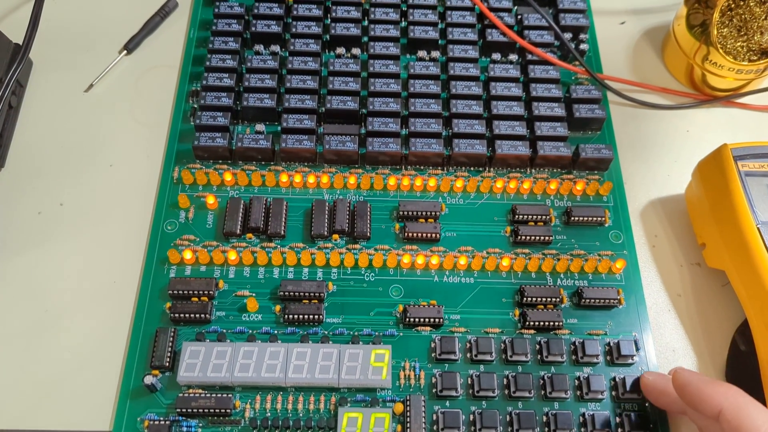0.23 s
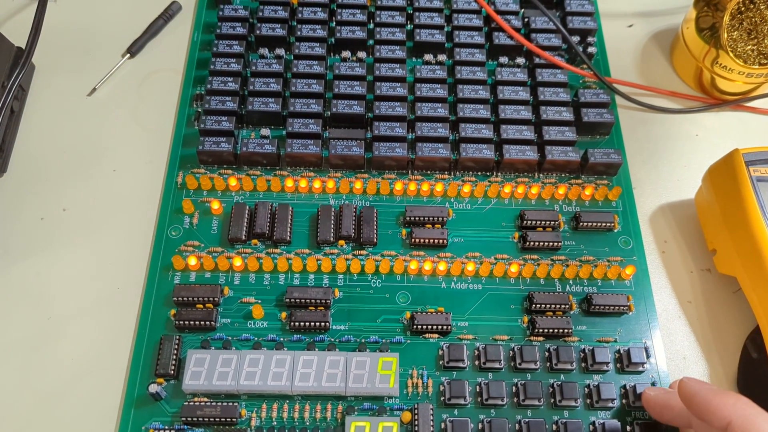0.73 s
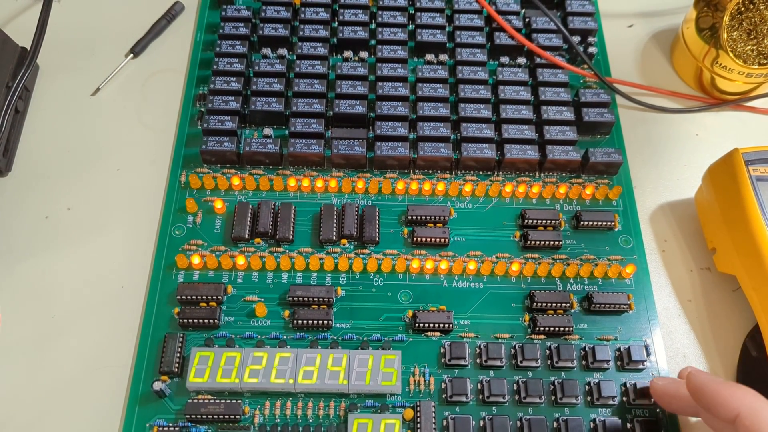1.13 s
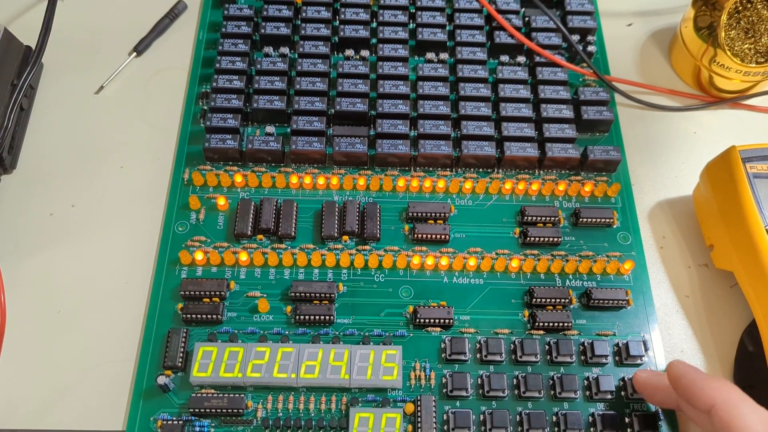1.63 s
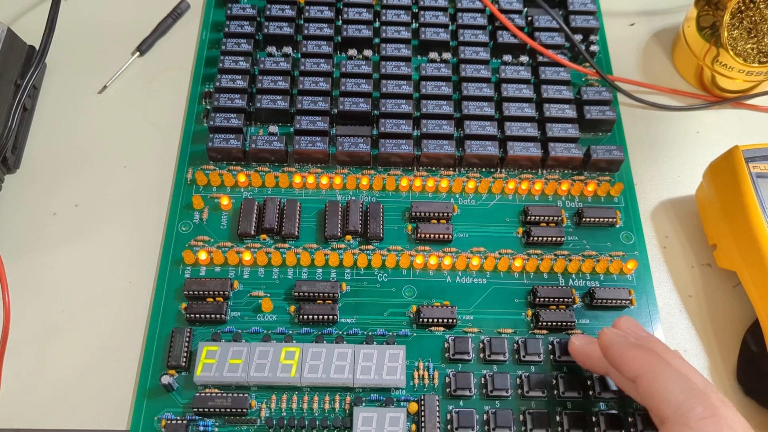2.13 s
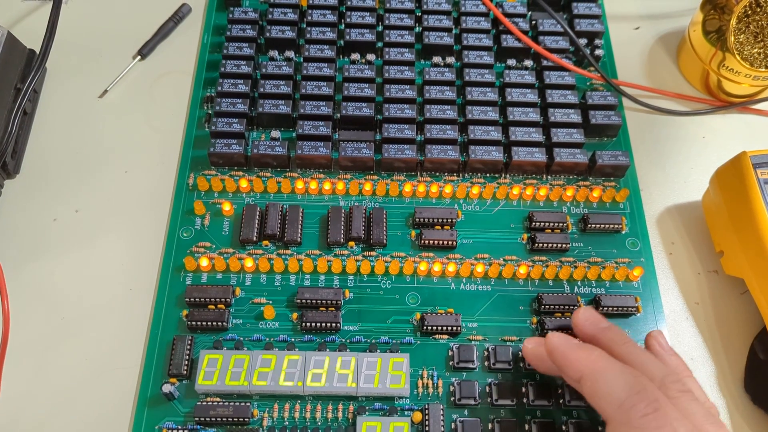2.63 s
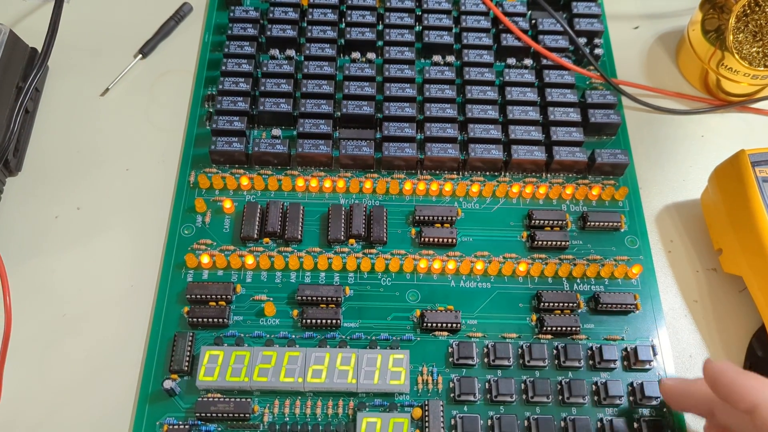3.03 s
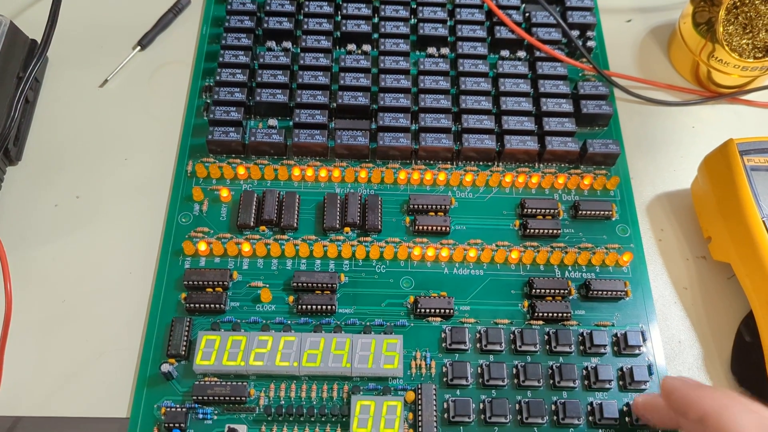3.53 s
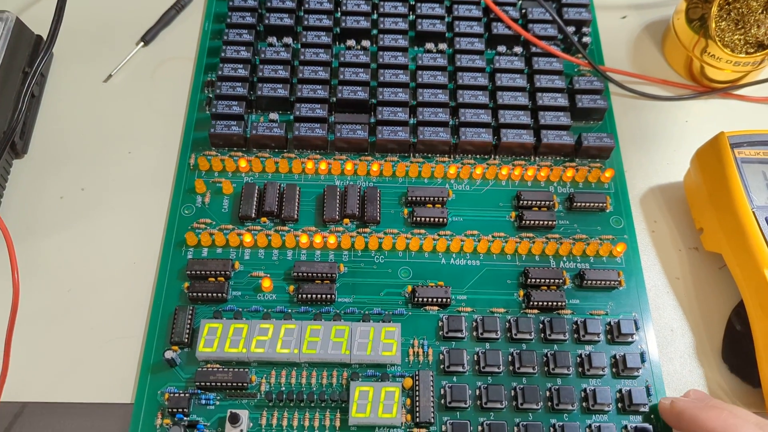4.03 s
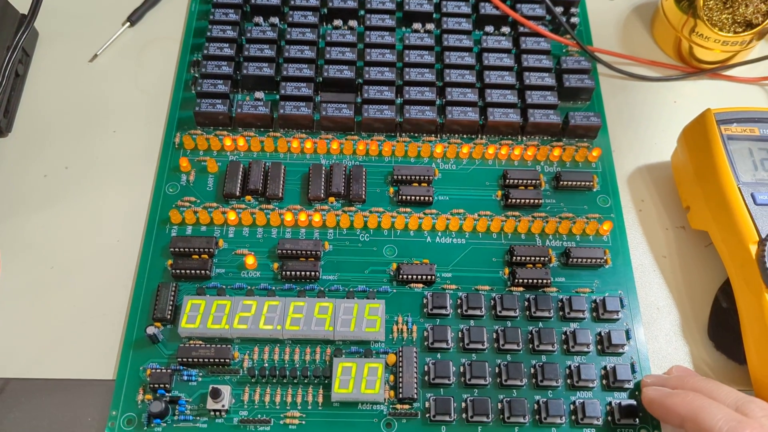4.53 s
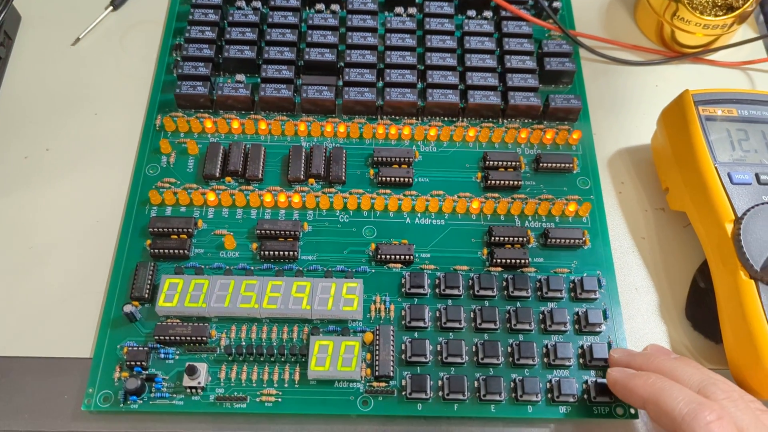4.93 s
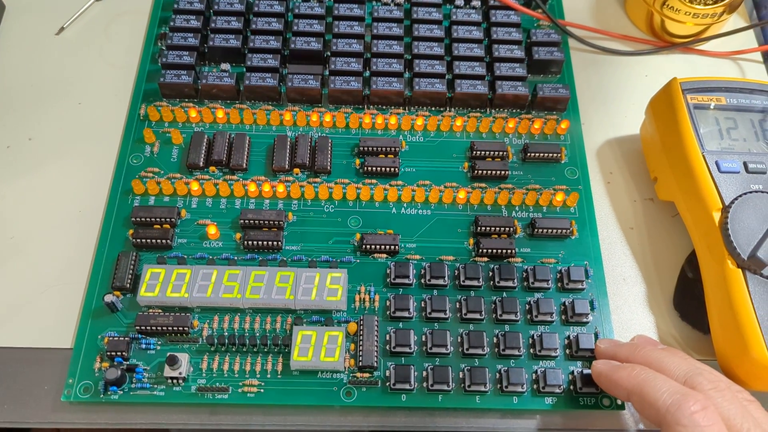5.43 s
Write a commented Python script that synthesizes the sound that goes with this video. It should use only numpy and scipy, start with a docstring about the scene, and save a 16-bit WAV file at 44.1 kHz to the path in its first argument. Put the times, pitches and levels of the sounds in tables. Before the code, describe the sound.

A few lone relay clicks and button presses over faint room hiss and hum, then a fast, steady mechanical relay chatter runs to the end.

```python
"""A relay computer on a desk, heard from close above in a small room.
A steady rush and low hums come first: noise shaped in two bands, and wavering sine lines.
Single relays, built from noise bursts and case modes, then click as keys thump and tick in struck modes.
From about 3.6 s a clock runs at some eleven cycles a second: in a loop of six steps, volleys of relays
pull in and drop out, the circuit board drums along in its own modes, and the small room answers."""
import sys
import numpy as np
from scipy import signal
from scipy.fft import rfft, irfft
from scipy.io import wavfile
from scipy.ndimage import uniform_filter1d

SR = 44100
rng = np.random.default_rng(int(sys.argv[2]) if len(sys.argv) > 2 else 0)


def int16_out(signal):
    """Quantize to a 16-bit WAV file."""
    q = np.round(np.clip(np.atleast_2d(signal).T, -1, 1) * 32767)
    wavfile.write(sys.argv[1], SR, q.astype(np.int16))


N = 251370

# Lone relay clicks: (time [s], relative level [dB], case ring boost [dB], case ring centre [Hz],
# sparkle [dB], left over right [dB])
SINGLE_CLICKS = [(1.019, -38, 5, 6900, -2, 1.5), (1.6932, -35.5, 7, 6900, 2, -2.5),
                 (2.6597, -26.5, 6, 1860, 0.5, 0.5), (3.602, -29, -2.5, 2000, 7, -4.5),
                 (3.6373, -35, 1, 2980, 1, 3)]
# Six program steps, each with its own timing, level and colour for a volley pulling in and one
# dropping out, before scatter and drift: (time after the tick [s], relative level [dB],
# case ring boost [dB], case ring centre [Hz], sparkle [dB], left over right [dB])
PULL_IN_STEPS = [(.0044, -28, -3, 2190, -2, -5), (.0058, -28, -2.5, 2280, -3, -2.5),
                 (.0045, -27.5, 0.5, 2720, -3, -1), (.0047, -27, -2, 2290, -2.5, -3.5),
                 (.0048, -27.5, -1, 2350, -1, -8), (.0051, -25, -1.5, 2400, -1.5, -3)]
DROP_OUT_STEPS = [(.0442, -28.5, 4.5, 2450, -2, -4.5), (.0445, -27, -3.5, 3300, -3, -4.5),
                  (.0443, -29, -0.5, 1800, -2.5, -6), (.0438, -30.5, 4.5, 1760, -4, -13.5),
                  (.0442, -26.5, 3, 2200, -3, -5), (.0447, -26, 1.5, 2300, -2, -6)]
CLOCK_START_S, CLOCK_PERIOD_S = 3.632, .08795  # first tick, and time from tick to tick


def gain_of(db):
    """Decibels to amplitude."""
    return 10 ** (np.asarray(db) / 20)


def evened(x):
    """Scales to rms 1."""
    return x / np.sqrt(np.mean(x ** 2) + 1e-20)


def read(points, hz):
    """Joins (frequency [Hz], value) points by straight lines on a log frequency axis."""
    f, value = np.transpose(points)
    return np.interp(np.log(hz + 1), np.log(f + 1), value)


def add(mix, s, sound):
    """Mixes a sound in at time s, cutting whatever runs past the end."""
    part = mix[:, max(round(s * SR), 0):][:, :sound.shape[-1]]
    part += sound[..., :part.shape[1]]


def colour(x, curve_db, size=2048):
    """Causal minimum-phase filter with the gain curve_db(Hz), one row for each ear."""
    log_gain = np.log(gain_of(curve_db(abs(np.fft.fftfreq(size, 1 / SR)))))
    taps = np.fft.ifft(np.exp(np.conj(signal.hilbert(log_gain)))).real
    return signal.fftconvolve(x, taps[:, :size // 2], axes=1)[:, :x.shape[1]]


def shaped(x, spectrum):
    """Gives each ear its own side of a (Hz, left dB, right dB) spectrum."""
    def curve_db(hz):
        points = np.array(spectrum)
        return np.array([read(points[:, [0, ear]], hz) for ear in (1, 2)])
    return colour(x, curve_db)


def ring(modes, scatter_db=0.):
    """Decaying sines of a struck body; where the blow lands changes how much each mode gets."""
    t = np.arange(SR // 4) / SR
    out = np.zeros(len(t))
    for hz, db, t60 in modes:
        decay = gain_of(db + scatter_db * rng.standard_normal() - 60 * t / t60)
        out += decay * np.sin(2 * np.pi * (hz * t + rng.random()))
    return out


def onset(rise_s):
    """Gain of a body that needs a moment to get moving."""
    t = np.arange(SR // 4) / SR
    return 1 - np.exp(-(t / rise_s) ** 2)


def air(low_db=-53.5, high_db=-65.5):
    """Steady rush of the room: shaped noise in a low and a high layer, alike in both ears in the bass."""
    # Spectra of the two layers: (frequency [Hz], relative density [dB per Hz])
    low_spectrum = [(20, -39), (32, -16.5), (45, -17.5), (65, -10), (90, -10), (135, -4), (270, -8.5),
                    (480, -8.5), (600, -9.5), (1400, -11), (2000, -10), (2800, -18.5), (3640, -52),
                    (6000, -100)]
    high_spectrum = [(1650, -59.5), (2800, 3), (3120, 4), (3860, -10), (4240, -8.5), (5560, -15.5),
                     (6020, -14), (9530, -32.5), (11700, -27.5), (13800, -29.5), (15100, -38), (16000, -32)]
    # Likeness of the ears: (frequency [Hz], shared part of the power [0-1])
    ear_likeness = [(60, .97), (130, .92), (290, .75), (640, .2), (1400, .03), (15000, .03)]
    hz = np.fft.rfftfreq(N, 1 / SR)
    left, other = rfft(rng.standard_normal((2, N)))
    same = np.sqrt(np.clip(read(ear_likeness, hz), 0, 1))
    right = same * left + np.sqrt(1 - same ** 2) * other
    noise = np.array([left, right])
    low = evened(irfft(noise * gain_of(read(low_spectrum, hz)), N))
    high = evened(irfft(noise * gain_of(read(high_spectrum, hz)), N))
    return gain_of(low_db) * low + gain_of(high_db) * high


def tone(hz, waver_hz):
    """A sine line of rms 1 whose pitch wavers by waver_hz (rms)."""
    drift = evened(uniform_filter1d(rng.standard_normal(N), SR // 8))
    return np.sqrt(2) * np.sin(2 * np.pi * np.cumsum(hz + waver_hz * drift) / SR)


def hum():
    """Mains hum, a drone that comes and goes early on, and a faint fan-like whine, all wavering sines."""
    # Loudness of the two hums in turn: (time [s], level [dB])
    mains_level = [(0, -76), (.9, -70), (1.6, -67.5), (2.2, -62), (3.6, -62.5), (4.2, -70), (5, -72),
                   (5.7, -62)]
    drone_level = [(0, -93), (.15, -61.5), (.35, -58), (.65, -62.5), (.85, -75), (1.25, -59), (1.6, -85.5),
                   (2, -64.5), (2.3, -84)]
    # Steady whine lines: (frequency [Hz], level [dB])
    whine_lines = [(1444, -68.5), (1575, -69.5)]
    t = np.arange(N) / SR
    mains = gain_of(np.interp(t, *np.transpose(mains_level))) * tone(59.3, waver_hz=0.39)
    drone = gain_of(np.interp(t, *np.transpose(drone_level))) * tone(143.5, waver_hz=2.68)
    whine = sum(gain_of(db) * tone(hz, waver_hz=3.49) for hz, db in whine_lines)
    return mains + drone + whine


def relay(crack_t60, ring_db, ring_t60, case_db, snap_db, snap_t60=0.0045, case_t60=0.036, count=4):
    """One relay: the armature's snap and crack, a dense ring of spring and neighbours, a few case modes."""
    t = np.arange(SR // 20) / SR
    crack, dense = rng.standard_normal((2, 2, len(t)))
    voice = crack * gain_of(-60 * t / crack_t60) + dense * gain_of(ring_db - 60 * t / ring_t60)
    case_decay = gain_of(case_db - 60 * t / case_t60)
    for hz in np.exp(rng.uniform(np.log(1800), np.log(8000), count)):
        voice += case_decay * np.sin(2 * np.pi * (hz * t + rng.random((2, 1))))
    # the direct snap is the same in both ears and reaches the right one two samples earlier
    snap = rng.choice([-1, 1], len(t)) * gain_of(snap_db - 60 * t / snap_t60)
    voice += np.array([np.roll(snap, 2), snap])
    return voice / np.linalg.norm(voice)


def voiced(sound, db, case_db, case_hz, sparkle_db, side_db, case_octaves=0.59):
    """Level (rms over 18 ms, before colouring) and colour, standing for a place on the board."""
    def curve_db(hz):
        case = case_db * np.exp(-(np.log2((hz + 1) / case_hz) / (case_octaves + 0.15)) ** 2)
        sparkle = sparkle_db * read([(8000, 0), (10000, 1)], hz)
        side = side_db * read([(2800, 0), (4200, 1), (7000, 1), (10000, 0)], hz)
        return case + sparkle + np.array([side, -side]) / 2
    levelled = sound / np.linalg.norm(sound) * np.sqrt(.018 * SR)
    return gain_of(db) * colour(levelled, curve_db)


def single_clicks(level_db=13.5, case_octaves=0.27):
    """Lone relays answer the keys, their case modes barely ringing; the last is the clock's first tick."""
    # Spectrum of a lone relay: (frequency [Hz], left [dB], right [dB])
    lone_spectrum = [(147.6, -33, -28), (440, -11.5, -7), (1000, -13, -48), (1730, -7.5, -3.5),
                     (2280, -1.5, -12.5), (3170, -7.5, -1), (5240, -2.5, 0.5), (5650, -24, -1.5),
                     (7120, -6, -3), (9040, -13.5, -12), (9700, -13.5, -24), (12300, -18.5, -14),
                     (13720, -21, -24), (15200, -28, -19.5)]
    out = np.zeros((2, N))
    for s, *voicing in SINGLE_CLICKS:
        voice = relay(crack_t60=0.011, ring_db=-12.5, ring_t60=0.066, case_db=-23, snap_db=1, snap_t60=0.0035)
        add(out, s, voiced(voice, *voicing, case_octaves=case_octaves))
    return gain_of(level_db) * shaped(out, lone_spectrum)


def board(single_db=-22, pull_db=-15.0, drop_db=-21, rise_s=0.0036):
    """Each click or volley also shakes the circuit board, each time with another mix of its modes."""
    # Circuit board modes: (frequency [Hz], relative level [dB], t60 [s])
    board_modes = [(231, -9, 0.12), (305.6, -4, 0.16), (331.2, -5.5, 0.2), (392.6, -5.5, 0.095),
                   (446.6, -1, 0.076), (702, -13, 0.13), (1138, 0.5, 0.044), (1247, -8, 0.079)]
    out = np.zeros((2, N))
    pulls = clocked(PULL_IN_STEPS, first_cycle=1)
    drops = clocked(DROP_OUT_STEPS)
    for blows, share_db in ((SINGLE_CLICKS, single_db), (pulls, pull_db), (drops, drop_db)):
        for s, db, *_ in blows:
            add(out, s, gain_of(db + share_db) * ring(board_modes, scatter_db=2.8) * onset(rise_s))
    return out


def keys(desk_rise_s=0.0081, tick_rise_s=.0004, clack_db=-4, clack_t60=0.039, clack_hz=2300):
    """A finger works a key: a plastic tick, a dull clack of the loose cap and a thump into the desk."""
    # Key strokes: (time [s], desk thump gain [dB], plastic tick gain [dB])
    strokes = [(1.021, -48, -56), (1.694, -48, -44), (1.813, -64, -45), (2.6598, -43.5, -35),
               (2.7507, -48, -35.5), (2.767, -60, -40), (3.606, -40.5, -37.5)]
    # Modes of key plastic and of desk: (frequency [Hz], relative level [dB], t60 [s])
    plastic_modes = [(389, -16.5, 0.13), (428, -34, 0.046), (974, -26, 0.024), (1386, -6.5, 0.04),
                     (1570, -6.5, 0.017), (1733, -5, 0.045)]
    desk_modes = [(84, 6.5, 0.058), (102, -8, 0.15), (120.2, -4.5, 0.15), (157, 2.5, 0.039)]
    out = np.zeros((2, N))
    t = np.arange(SR // 4) / SR
    dull = signal.butter(3, clack_hz, fs=SR, output="sos")
    for s, thump_db, tick_db in strokes:
        clack = evened(signal.sosfilt(dull, rng.standard_normal((2, len(t)))))
        clack *= gain_of(clack_db - 60 * t / clack_t60)
        tick = (ring(plastic_modes) + clack) * onset(tick_rise_s)
        thump = ring(desk_modes) * onset(desk_rise_s)
        add(out, s, gain_of(thump_db) * thump + gain_of(tick_db) * tick)
    return out


def room(x, first_s=0.013, swell_s=0.002):
    """Walls answer after a short gap with sparse random echoes; each band dies at its own speed."""
    # Decay of the room: (frequency [Hz], t60 [s])
    decay_times = [(200, 0.53), (2000, 0.17), (5000, 0.3), (9000, 0.22), (15000, 0.43)]
    # Tone of the room: (frequency [Hz], gain [dB])
    tail_spectrum = [(200, -9), (2000, -9.5), (5000, -11), (9000, -11.5), (15000, -19)]
    t = np.arange(SR // 2) / SR
    taps = rng.standard_normal((2, len(t))) * (rng.random((2, len(t))) < 5000 / SR)  # 5000 echoes a second
    taps *= 1 - np.exp(-np.maximum(t - first_s, 0) / swell_s)
    hz, when, bands = signal.stft(taps, SR, nperseg=256)
    bands *= gain_of(-60 * when / read(decay_times, hz)[:, None])
    tail = signal.istft(bands, SR, nperseg=256)[1]
    tail = colour(tail / np.linalg.norm(tail[0]), lambda f: read(tail_spectrum, f)[None])
    return signal.fftconvolve(x, tail, axes=1)[:, :N]


def clocked(loop, first_cycle=0):
    """Plays the loop's steps in turn, one per tick, with scatter: no two strikes are alike."""
    case_scatter_db, case_scatter_octaves = 1.2, .04
    # drift as the microphone moves over the board: louder, brighter and to the left [dB per s]
    swell, brighten, leftward = 0.1, 0.54, 1.15
    rows = []
    for cycle in range(first_cycle, int((N / SR - CLOCK_START_S) / CLOCK_PERIOD_S) + 1):
        delay, db, case_db, case_hz, sparkle_db, side_db = loop[cycle % len(loop)]
        case_db += case_scatter_db * rng.standard_normal()
        case_hz *= 2 ** (case_scatter_octaves * rng.standard_normal())
        run_s = cycle * CLOCK_PERIOD_S
        rows.append((CLOCK_START_S + run_s + delay, db + swell * run_s, case_db, case_hz,
                     sparkle_db + brighten * run_s, side_db + leftward * run_s))
    return rows


def volley(bank, delays, blows_db):
    """Several relays, drawn at random from the bank, strike, each after its own delay [s]."""
    out = np.zeros((2, SR // 12))
    for which, delay, db in zip(rng.permutation(len(bank)), delays, blows_db):
        add(out, delay, gain_of(db) * bank[which])
    return out


def drop_outs(bank, level_db=7.5, lead_s=.0055, spread_s=.013, others_db=-5, soft_db=6, count=8):
    """Contacts part softly, then springs throw the armatures on their stops, loosely in step."""
    out = np.zeros((2, N))
    for s, db, case_db, *voicing in clocked(DROP_OUT_STEPS):
        delays = spread_s * (np.arange(count) + rng.random(count)) / count
        softening_db = soft_db * np.maximum(1 - delays / lead_s, 0)
        blows_db = others_db + rng.normal(0, 2.0, count) - softening_db
        # a strong case ring means that one relay stands out of the volley
        sound = volley(bank, np.r_[lead_s, delays], np.r_[max(case_db, 0), blows_db])
        click = voiced(sound, db, case_db, *voicing, case_octaves=0.11)
        add(out, s - lead_s, gain_of(level_db) * click)
    # in some cycles one slow relay lets go late in its volley
    slow_cycles, slow_delay_s, slow_db = (1, 3, 9, 15, 17, 21), .0508, -27.5
    for cycle in slow_cycles:
        slow = np.sqrt(SR / 50) * bank[rng.integers(len(bank))]  # rms 1 over 20 ms
        add(out, CLOCK_START_S + cycle * CLOCK_PERIOD_S + slow_delay_s, gain_of(slow_db) * slow)
    return out


def pull_ins(bank, level_db=12.0, spread_s=.012, fade_db=9, lead_s=.0013, lead_db=-13, count=8):
    """Contacts touch lightly, then the armatures slam home one upon another, the late ones softer."""
    out = np.zeros((2, N))
    for s, *voicing in clocked(PULL_IN_STEPS, first_cycle=1):  # the very first tick is a single click
        lag = np.r_[0, ((np.arange(count) + rng.random(count)) / count) ** 1.6]
        blows_db = -fade_db * lag + np.r_[0, rng.normal(-2, 3, count)]
        sound = volley(bank, np.r_[0, lead_s + spread_s * lag], np.r_[lead_db, blows_db])
        add(out, s - lead_s, voiced(sound, *voicing))
    return gain_of(level_db) * out


def scene(count=40):
    """Room rush and hum, then lone relays, board and keys, then the clocked bank of relays."""
    # Spectrum of a volley: (frequency [Hz], left [dB], right [dB])
    volley_spectrum = [(150, -35.5, -35), (540, -21, -24), (1050, -17, -30), (1270, -11, -23.5),
                       (1725, -8, -11.5), (2220, -1, -5.5), (2970, -4.5, -15), (3110, -10, -8),
                       (3820, -14, -9.5), (4730, -9.5, -0.5), (5950, -15, -10), (7350, -7.5, -10.5),
                       (7380, -14.5, -11), (9660, -18.5, -17), (11700, -14, -17.5), (14200, -21, -18),
                       (14800, -18.5, -43)]
    bank = [relay(crack_t60=0.012, ring_db=-5.5, ring_t60=0.063, case_db=-13.0, snap_db=-5.5)
            for _ in range(count)]
    chatter = gain_of(4.5) * shaped(drop_outs(bank) + pull_ins(bank), volley_spectrum)
    machine = single_clicks() + board() + keys() + chatter
    return air() + hum() + machine + room(machine)


def record(dry):
    """The recorder rounds off the tallest peaks, then limits the band to 16.1 kHz."""
    soft = .5 * np.tanh(dry / .5)
    low_pass = signal.firwin(255, 16100, window=("kaiser", 8), fs=SR)
    return signal.oaconvolve(soft, low_pass[None], "same")


dry = scene()
out = record(dry)
int16_out(out)
```